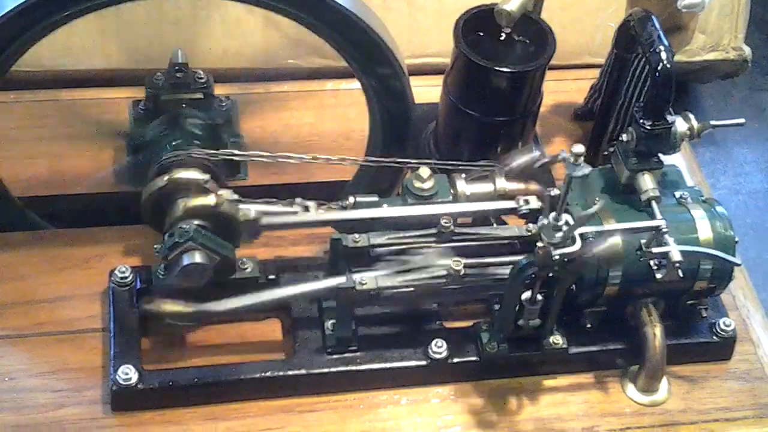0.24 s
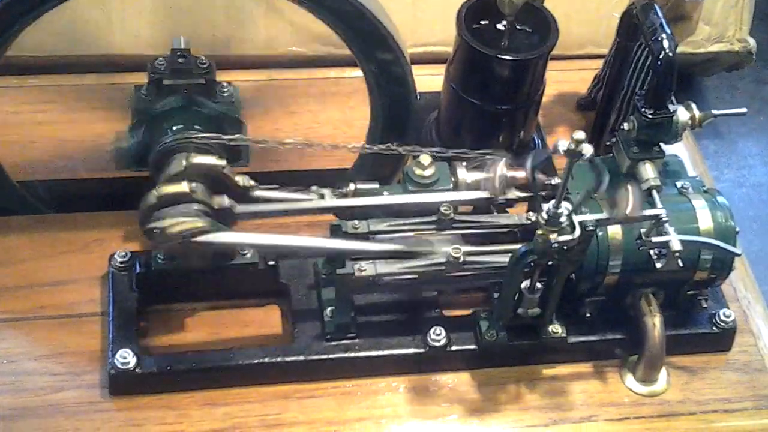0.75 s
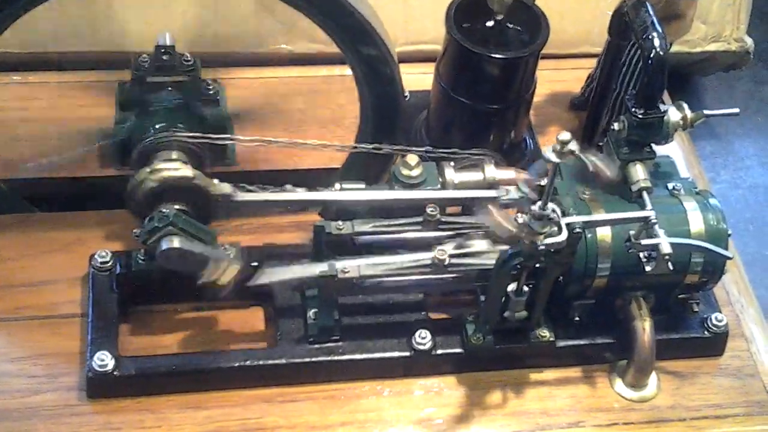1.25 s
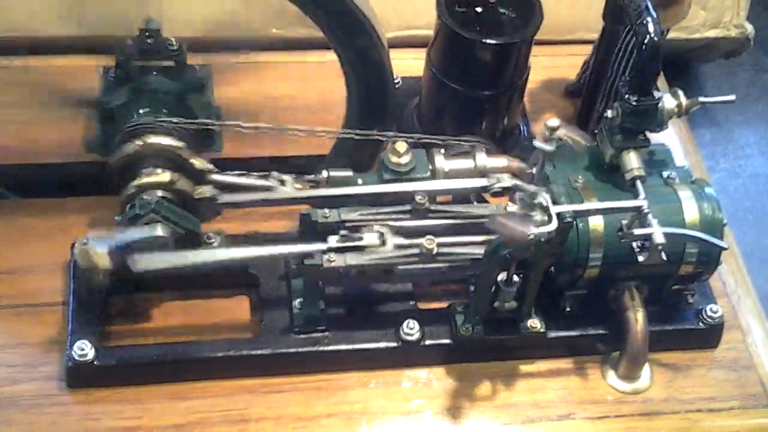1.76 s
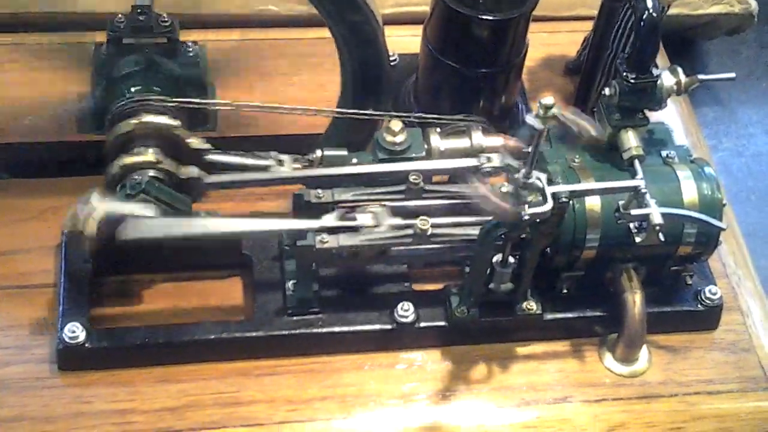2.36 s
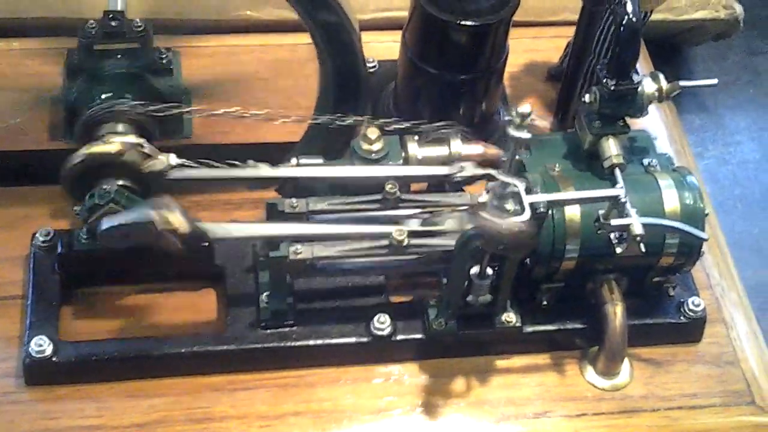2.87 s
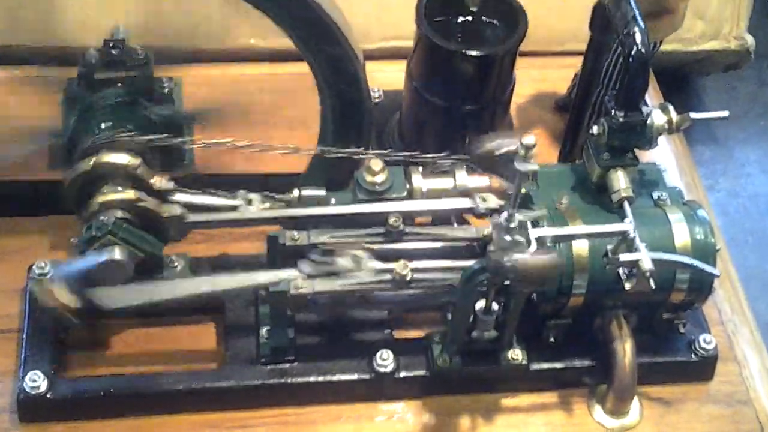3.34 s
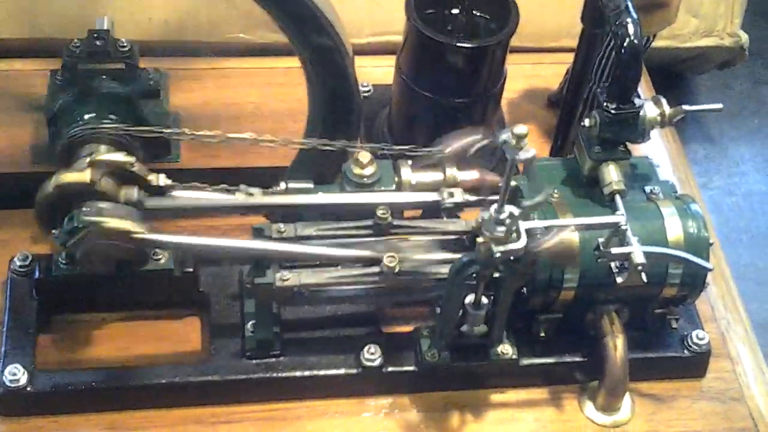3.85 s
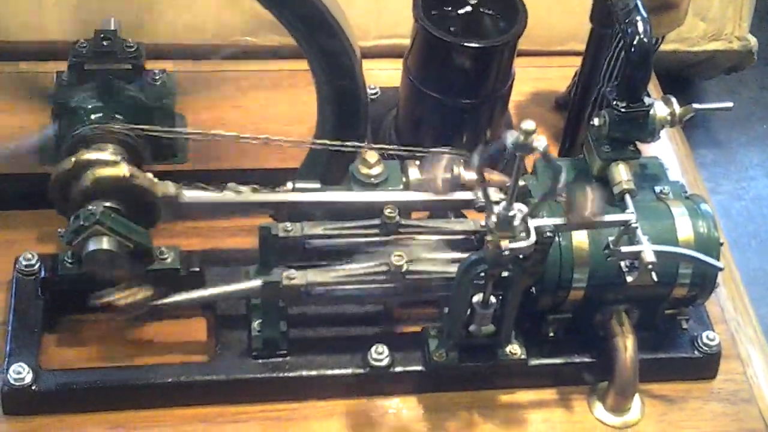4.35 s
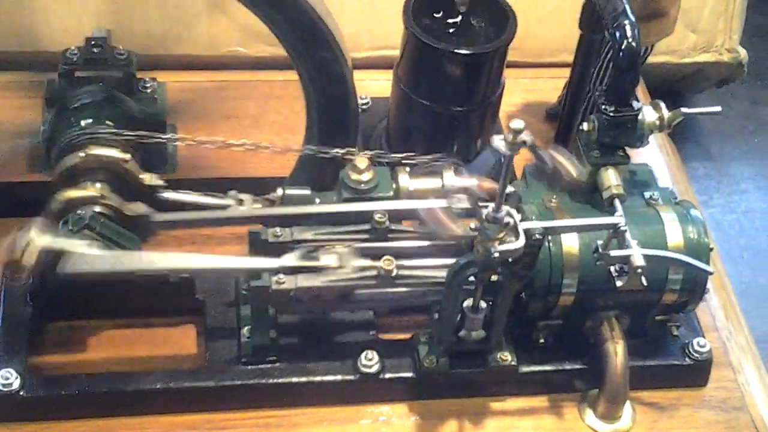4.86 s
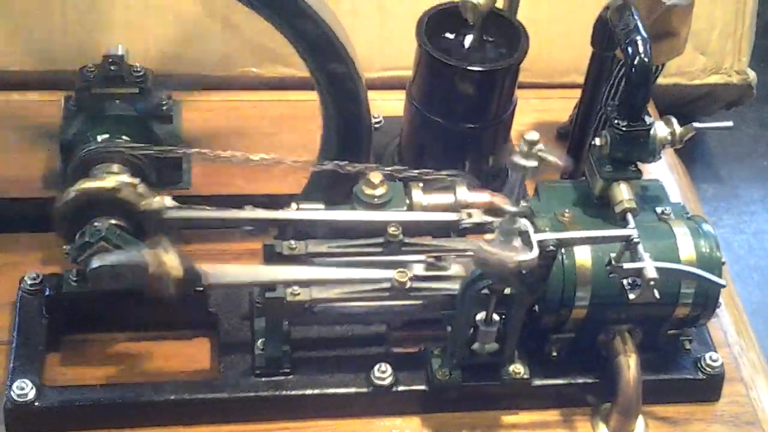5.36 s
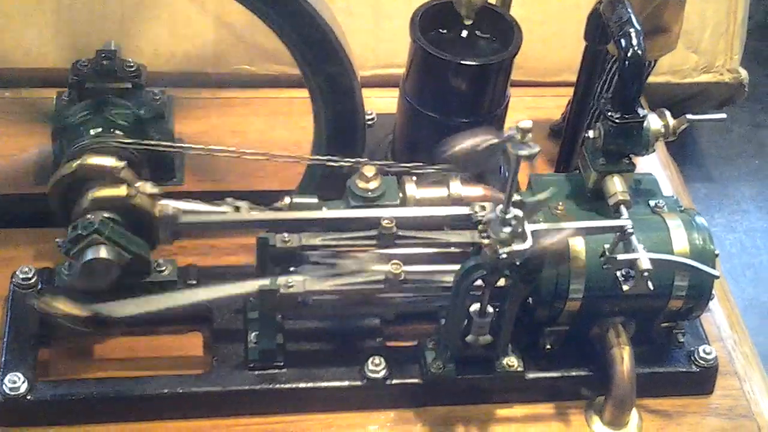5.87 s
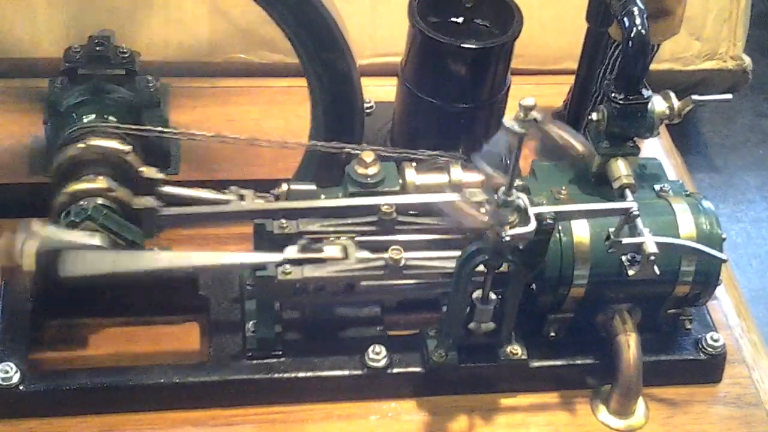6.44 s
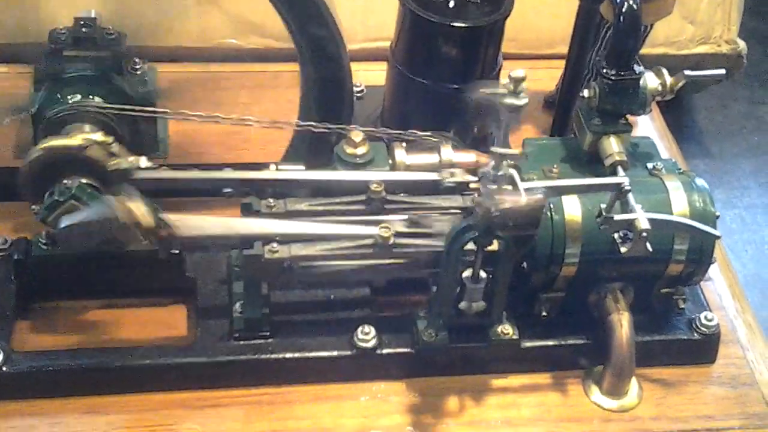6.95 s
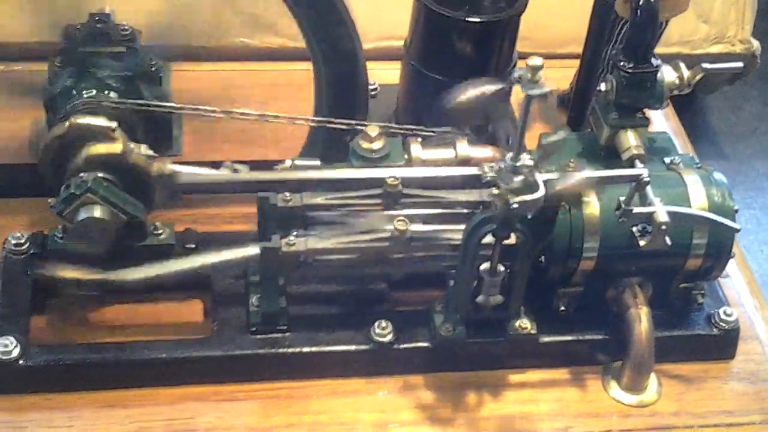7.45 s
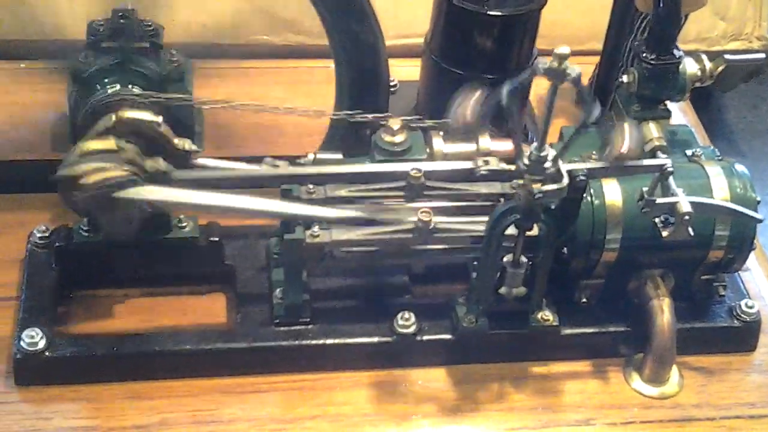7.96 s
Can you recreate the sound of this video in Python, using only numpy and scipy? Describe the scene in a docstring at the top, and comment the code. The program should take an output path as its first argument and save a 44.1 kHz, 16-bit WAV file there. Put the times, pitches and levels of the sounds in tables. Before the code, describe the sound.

Close, handheld recording of a small model mill engine running indoors. A dull double knock repeats about three times a second, ringing through its metal bed and wooden board. Between knocks, links tick brightly and irregularly, slides rumble and bump, and air whistles softly through valves. Brief rustles pass near the microphone. Past the middle, a compressor starts nearby and its low hum climbs quickly, then holds under the clatter to the end.

```python
"""Indoors, over steady hiss and a thin whine, a small model mill engine turns slowly on compressed air.
From the start, a slack bearing knocks twice into the bed on each turn, and the bed and its board ring.
Between knocks the links tick, the slides rumble and bump, and air whistles through the valve ports.
Short bright rustles of shaped noise pass near 2.4 s; at 5.15 s an air compressor starts nearby,
its hum made of sines that climb with the shaft speed; more rustles follow near 5.9 and 6.2 s."""
import sys
import numpy as np
from scipy import signal
from scipy.fft import rfft, irfft
from scipy.io import wavfile

SR = 44100
rng = np.random.default_rng(int(sys.argv[2]) if len(sys.argv) > 2 else 0)


def log_audio(samples):
    """Write samples as a 16-bit WAV file to the path given in sys.argv[1]."""
    # one column per channel
    frames = np.atleast_2d(samples).T
    # limit to full scale, then quantise
    limited = np.clip(frames, -1, 1)
    pcm = np.round(limited * 32767).astype(np.int16)
    wavfile.write(sys.argv[1], SR, pcm)


N = 362061


def from_db(db):
    """Turn decibels into a gain."""
    return 10 ** (np.asarray(db) / 20)


def rms_one(x):
    """Scale a signal to rms 1."""
    return x / np.sqrt(np.mean(x ** 2) + 1e-20)


def in_time(rows):
    """Draw straight lines between the timed rows, one curve for each column after the time."""
    s, *columns = np.transpose(rows)
    t = np.arange(N) / SR
    return [np.interp(t, s, column) for column in columns]


def drift(rate_hz):
    """A smooth random wander with rms 1; a higher rate wanders faster."""
    r = np.exp(-2 * np.pi * rate_hz / SR)
    noise = rng.standard_normal(N + SR)
    # the first second is dropped so that the filter has settled
    return rms_one(signal.lfilter([1], [1, -2 * r, r * r], noise)[SR:])


def band(x, edges_hz):
    """Keep only the sound between two frequencies."""
    return signal.sosfilt(signal.butter(2, edges_hz, "band", fs=SR, output="sos"), x + 1e-18)


def coloured(x, spectrum):
    """Shape a sound to a (frequency [Hz], level [dB]) curve, then scale it to rms 1."""
    hz, db = np.transpose(spectrum)
    f = np.maximum(np.fft.rfftfreq(N, 1 / SR), 1)
    gain = from_db(np.interp(np.log(f), np.log(hz), db))
    return rms_one(irfft(rfft(x) * gain, N))


def grains(per_s, spread_db):
    """Random tiny contacts of uneven size and either sign, rms 1."""
    sizes = from_db(spread_db * np.minimum(rng.exponential(1, N), 5))
    signed = sizes * rng.choice([-1, 1], N)
    return rms_one(signed * (rng.random(N) < per_s / SR))


def clicks(times, db):
    """Single-sample clicks of given levels at given times."""
    out = np.zeros(N)
    at = np.clip(np.round(times * SR).astype(int), 0, N - 1)
    np.add.at(out, at, from_db(db))
    return out


def ring(force, hz, t60):
    """A resonance: a unit click sets off a sine of height 1 that fades by 60 dB in t60 seconds."""
    r = from_db(-60 / (t60 * SR))
    w = 2 * np.pi * hz / SR
    return signal.lfilter([0, np.sin(w)], [1, -2 * r * np.cos(w), r * r], force + 1e-18)


def strike(modes, times, db, spread_db, pitch_hz=None):
    """Each blow sets every (Hz, t60, swing) mode ringing, with a little chance in its strength."""
    vary = spread_db * rng.standard_normal((len(times), len(modes)))
    if pitch_hz is not None:  # favour the modes near the pitch of the blow: 17 dB less per octave away
        mode_hz = np.array(modes)[:, 0]
        vary -= 17.0 * np.abs(np.log2(mode_hz / pitch_hz[:, None]))
    return sum(swing * ring(clicks(times, db + vary[:, k]), hz, t60)
               for k, (hz, t60, swing) in enumerate(modes))


# colour of the room and microphone hiss: (frequency [Hz], relative level [dB per Hz])
HISS_COLOUR = [(20, -30), (50, -17.5), (120, -7), (300, 8.5), (500, 13), (900, 4.5), (1600, 1), (3000, -1),
               (3800, -6), (5200, -16), (6000, -22), (8000, -12.5), (12000, -8.5), (14400, -12)]
# steady electric whine: (frequency [Hz], level [dB rms])
WHINE_TONES = [(11112, -79), (11650, -77), (12337, -76), (12397, -63), (12456, -77)]
HISS_DB = -43


def background():
    """Shaped noise makes a hiss of slightly uneven level; close steady sines make a thin whine."""
    t = np.arange(N) / SR
    whine = sum(np.sqrt(2) * from_db(db) * np.sin(2 * np.pi * hz * t) for hz, db in WHINE_TONES)
    level = from_db(HISS_DB + 1.6 * drift(16))
    return level * coloured(rng.standard_normal(N), HISS_COLOUR) + whine


# rustles close to the microphone: (start [s], swell [s], hold [s], level at the hold [dB])
RUSTLE_TIMES = [(2.367, 0.07, 0.028, -43), (2.402, 0.12, .045, -37.5), (5.891, 0.036, 0.017, -45.5),
                (6.205, 0.02, .001, -41.5)]
# colour of the rustles: (frequency [Hz], relative level [dB per Hz])
RUSTLE_COLOUR = [(880, -29), (1500, 2.5), (1950, -2.5), (2340, -9.5), (4890, -3), (6440, -15.5),
                 (7350, -11.5), (12600, -5), (14400, -9)]
RUSTLE_FADE_S, RUSTLE_RANGE_DB = 0.11, 49  # each one swells and fades over this range


def rustles():
    """Bright, slightly grainy bursts of noise that swell, hold and fade."""
    t = np.arange(N) / SR
    quiet = -RUSTLE_RANGE_DB
    gain = 0
    for start, swell, hold, db in RUSTLE_TIMES:
        corners = np.cumsum([start, swell, hold, RUSTLE_FADE_S])
        gain = gain + from_db(db + np.interp(t, corners, [quiet, 0, 0, quiet], -90, -90))
    noise = rng.standard_normal(N) + 0.48 * grains(710, 1.7)
    return gain * coloured(noise, RUSTLE_COLOUR)


# the compressor runs up to speed: (time [s], shaft speed [Hz], load [dB])
COMPRESSOR_RUN = [(5.15, 40, -50), (5.25, 46, -27), (5.32, 50.4, -18), (5.45, 56, -5), (5.85, 58.2, -2),
                  (6.4, 59, 0), (7.3, 59.7, 0), (8.21, 59.95, 1)]
# its hum at 0 dB load, before the path lifts: (multiple of shaft speed [-], level [dB rms])
HUM_ORDERS = [(1, -62), (2, -60.5), (3, -51), (4, -62), (5, -57), (6, -54), (7, -55), (8, -56), (10, -54.5),
              (12, -61), (14, -57)]
# resonances on the way to the microphone: (centre [Hz], width [Hz], lift [dB])
HUM_RESONANCES = [(145, 22, 16), (172, 2.5, -7), (347, 7, 11), (598, 8, 7)]
MOTOR_RUMBLE_DB, MOTOR_RUMBLE_HZ = -66, (35, 160)  # level at 0 dB load


def compressor():
    """Sines at multiples of the rising shaft speed, the higher ones wavering more, over a low rumble."""
    shaft_hz, load_db = in_time(COMPRESSOR_RUN)
    phase = 2 * np.pi * np.cumsum(shaft_hz) / SR
    on = np.arange(N) / SR > COMPRESSOR_RUN[0][0]
    hum = 0
    for k, db in HUM_ORDERS:
        # a tone grows or sinks as it climbs through a resonance
        path_db = sum(lift_db * np.exp(-((k * shaft_hz - centre_hz) / width_hz) ** 2)
                      for centre_hz, width_hz, lift_db in HUM_RESONANCES)
        waver_db = (0.7 + 0.09 * k) * drift(4.7)
        tone = np.sin(k * phase + rng.uniform(0, 2 * np.pi))
        hum = hum + from_db(db + load_db + path_db + waver_db) * tone
    noise = rms_one(band(rng.standard_normal(N), MOTOR_RUMBLE_HZ))
    rumble = from_db(MOTOR_RUMBLE_DB + load_db) * noise
    return on * (np.sqrt(2) * hum + rumble)


def turn_starts():
    """Each knock starts a turn; one more turn is added before and after."""
    s = np.array(KNOCK_BLOWS)[:, 0]
    return np.r_[2 * s[0] - s[1], s, 2 * s[-1] - s[-2]]


# changes round one turn, from the knock: (share of turn [-], sliding load [dB], valve flow [dB])
TURN_CYCLE = [(0, -5, -12), (.05, -8, -20), (.085, -8, -2), (.145, -5, 1), (.25, -3, -3), (.33, -3, -7),
              (.41, -6, -16), (.49, -5, -16), (.53, 1, 0), (.58, -1, 0), (.66, -4, -4), (.75, 1, -3),
              (.85, 0, -2), (.93, -2, -9), (1, -5, -12)]


def round_the_turn():
    """Sliding load and valve flow follow the crank angle, which the knocks mark."""
    s = turn_starts()
    angle = np.interp(np.arange(N) / SR, s, np.arange(len(s))) % 1
    share, load_db, flow_db = np.transpose(TURN_CYCLE)
    return np.interp(angle, share, load_db), np.interp(angle, share, flow_db)


def every_turn(contacts, spread_db, jitter_s):
    """Repeat (share of turn, dB, ..) rows as (s, dB, ..) on every turn, never quite alike."""
    s = turn_starts()
    rows = np.array([(start + share * length, *rest)
                     for start, length in zip(s, np.diff(s))
                     for share, *rest in contacts])
    rows[:, :2] += rng.standard_normal((len(rows), 2)) * [jitter_s, spread_db]
    inside = (rows[:, 0] > 0) & (rows[:, 0] < N / SR)
    return rows[inside]


# whistles of the valve ports: (frequency [Hz], width [Hz], relative level [dB])
PORT_WHISTLES = [(3620, 200, 19.5), (3728, 300, 22), (3050, 450, 12), (4600, 1350, 7.5)]


def valve(level_db):
    """Air through the ports whistles in narrow bands: fluttering noise through paired resonances."""
    air = rng.standard_normal(N) * from_db(1.6 * drift(76) + 0.73 * drift(7.0))
    whistle = 0
    for hz, width, db in PORT_WHISTLES:
        t60 = 4.5 / width  # a narrow band rings longer
        whistle = whistle + from_db(db) * rms_one(ring(ring(air, hz, t60), hz, t60))
    return from_db(level_db) * rms_one(whistle)


# how strongly loose parts and rubbing slides drive the bed: (frequency [Hz], drive [dB])
LOOSE_PART_DRIVE = [(175, -15.5), (240, -43.5), (300, 6), (370, -7), (470, 2), (580, -11), (700, -6),
                    (800, -36), (970, 2), (1150, -2), (1260, -4), (1400, -11), (2000, -11.5)]


def loose_bed():
    """The bed's ringing modes, with the strengths that loose parts give them."""
    hz, t60, first, second = np.transpose(BED_MODES)
    at_hz, db = np.transpose(LOOSE_PART_DRIVE)
    drive = from_db(np.interp(np.log(hz), np.log(at_hz), db))
    return np.c_[hz, t60, np.sign(first) * drive]


# base levels before the changes round the turn: (time [s], rumble [dB], valve hiss [dB])
SLIDE_AND_VALVE_LEVELS = [(0, -37.5, -48), (1, -38.5, -51), (2.2, -38.5, -52.5), (2.7, -37, -52),
                          (2.95, -41, -49.5), (4.85, -40, -48), (5.2, -36.5, -47), (5.8, -39.5, -50.5),
                          (8.21, -38, -50.5)]
# crosshead and rods bump dully as the load reverses: (share of turn [-], blow level [dB])
REPEATED_BUMPS = [(.517, -41), (.75, -47.5), (.96, -49)]
# further loose bumps, loud and faint: (time [s], blow level [dB])
LOOSE_BUMPS = [(.018, -46), (0.099, -36.5), (0.221, -39.5), (0.283, -41), (0.359, -45), (0.492, -39),
               (0.586, -44), (0.651, -43), (0.719, -44), (0.955, -39), (1.035, -44), (1.143, -42),
               (1.302, -52), (1.427, -39.5), (1.521, -35.5), (1.757, -51), (1.866, -35), (1.903, -39),
               (1.975, -44), (2.179, -38), (2.22, -36), (2.269, -56), (2.55, -40), (2.741, -38.5),
               (3.093, -43), (3.4, -41), (3.651, -41.5), (3.611, -44), (3.778, -45), (3.802, -39.5),
               (3.984, -51), (4.094, -51), (4.6, -41), (4.71, -42), (4.966, -44), (5.221, -40),
               (5.344, -53), (5.399, -56), (5.413, -47), (5.591, -46), (5.715, -39.5), (5.879, -41),
               (5.909, -34), (6.041, -37.5), (6.149, -56), (6.199, -42), (6.286, -43), (6.357, -45),
               (6.658, -44), (6.987, -42), (7.474, -37), (7.512, -39), (7.851, -55), (8.104, -54),
               (8.134, -34.5), (8.15, -39.5)]
BUMP_SPREAD_DB, BUMP_JITTER_S = 0.5, 0.003906


def slides(level_db):
    """Rubbing contacts keep the bed rumbling, its ringing shortened by the contact; parts also bump."""
    load = from_db(level_db + 1.36 * drift(29))
    bumps = np.r_[every_turn(REPEATED_BUMPS, BUMP_SPREAD_DB, BUMP_JITTER_S), LOOSE_BUMPS]
    rumble = sum(swing * ring(load * grains(300, 2.4), hz, 0.43 * t60)
                 for hz, t60, swing in loose_bed())
    load_rms = np.sqrt(np.mean(load ** 2))
    return load_rms * rms_one(rumble) + strike(loose_bed(), *bumps.T, spread_db=2.5)


# ringing of links and chain: (frequency [Hz], relative level [dB], 60 dB fade [s])
LINK_MODES = [(2015, -8.5, 0.01), (2450, -4.5, 0.0037), (2887, -7, 0.0085), (3450, -10, 0.007),
              (4080, -14, 0.011), (5150, -25.5, 0.026)]
# links that tick at the same place on every turn: (share of turn [-], blow level [dB], pitch [Hz])
REPEATED_TICKS = [(.004, -27, 2100), (.066, -26, 2100), (.21, -34, 4300), (.33, -46, 3800),
                  (.455, -33, 4200), (.575, -44, 4270), (.739, -28, 2420), (.91, -34, 4200)]
# further loose ticks, from faint to sharp: (time [s], blow level [dB], pitch [Hz])
LOOSE_TICKS = [(0.0181, -21, 3530), (0.0944, -24, 3550), (0.173, -21, 2870), (0.209, -25, 2940),
               (0.2475, -22.5, 3650), (0.272, -34, 3500), (0.288, -28, 2900), (0.3393, -31, 2920),
               (0.352, -25, 2900), (0.3675, -27, 3100), (0.412, -17, 3460), (0.4898, -24, 2000),
               (0.6509, -30, 2160), (0.5627, -26, 2730), (0.702, -22, 3080), (0.719, -27, 3100),
               (1.011, -22, 3040), (1.101, -28, 3140), (1.1394, -18, 2870), (1.179, -28, 2580),
               (1.2007, -19.5, 3600), (1.2548, -22, 2700), (1.274, -28, 2670), (1.4216, -18.5, 3080),
               (1.456, -25.5, 3040), (1.499, -23, 3560), (1.5196, -20, 3460), (1.5355, -29, 2300),
               (1.575, -19, 2310), (1.862, -22.5, 2290), (1.9038, -24, 2180), (2.3981, -24, 2930),
               (2.4379, -25, 3510), (2.459, -27, 3480), (2.4757, -27, 2600), (2.498, -22, 3880),
               (2.6762, -22, 2370), (2.7545, -27, 3020), (2.735, -14, 2920), (3.0661, -23.5, 3270),
               (3.1562, -26, 2550), (3.3306, -23, 2850), (3.47, -28, 3600), (3.6144, -22.5, 3080),
               (3.6506, -26, 2830), (3.6878, -27, 2670), (3.704, -19.5, 3160), (3.7675, -24.5, 2550),
               (3.7815, -22.5, 3620), (3.8494, -22.5, 2930), (3.93, -24, 2560), (3.9817, -11, 2700),
               (4.0043, -25, 2970), (4.0877, -18, 3140), (4.1482, -25, 2750), (4.5999, -21.5, 2720),
               (4.722, -27, 2020), (4.7845, -24, 2870), (4.865, -25, 2920), (4.903, -24.5, 2120),
               (4.9629, -23, 2170), (5.033, -33, 3600), (5.061, -19.5, 2400), (5.1447, -29, 3760),
               (5.1875, -18, 3030), (5.3462, -31, 1880), (5.3949, -11, 2450), (5.4555, -28, 2040),
               (5.659, -41, 2160), (5.771, -24, 2000), (5.7905, -26, 2020), (5.7125, -13.5, 2870),
               (5.8732, -26, 2120), (5.913, -20.5, 3360), (5.957, -22, 3550), (5.9737, -23, 2020),
               (5.9989, -18, 2920), (6.039, -22, 3040), (6.1184, -17.5, 3040), (6.1555, -20.5, 3790),
               (6.194, -17.5, 1960), (6.2335, -22.5, 3700), (6.313, -25, 2620), (6.3645, -21, 2220),
               (6.558, -27, 2220), (6.6024, -29, 2540), (6.6774, -25, 2760), (6.9157, -29, 2520),
               (6.969, -21, 2870), (7.1312, -19.5, 2480), (7.1523, -22.5, 3820), (7.23, -27, 2440),
               (7.253, -31, 2900), (7.375, -24, 2560), (7.411, -26, 3640), (7.449, -29, 2480),
               (7.469, -22.5, 2900), (7.511, -21.5, 2890), (7.531, -17.5, 2400), (7.543, -32, 2600),
               (8.168, -26, 2150), (8.1261, -20, 2420)]
# ways to the microphone, direct and off the board and wall: (delay [s], level [dB])
TICK_ROUTES = [(.0012, -2), (.0035, -3.5), (.008, -12), (.013, -19)]
TICK_SPREAD_DB, TICK_JITTER_S = 1.8, .0008
CRACK_DB, CRACK_HZ = -1.0, (1100, 3300)  # the bare contact, beside the ringing links
THUD_DB, THUD_LAG_S = -23.5, 0.00296  # the bed's answer
CHATTER_DB = -54.5


def ticks():
    """Links click brightly and the bed answers dully; many small random clicks fill in."""
    events = np.r_[every_turn(REPEATED_TICKS, TICK_SPREAD_DB, TICK_JITTER_S), LOOSE_TICKS]
    s, tick_db, pitch_hz = events.T
    arrivals = [(s + lag, tick_db + db, pitch_hz) for lag, db in TICK_ROUTES]
    times, db, hz = np.concatenate(arrivals, axis=1)
    # neighbouring modes swing opposite ways
    links = [(mode_hz, t60, (-1) ** k * from_db(mode_db))
             for k, (mode_hz, mode_db, t60) in enumerate(LINK_MODES)]
    clinks = strike(links, times, db, spread_db=4.5, pitch_hz=hz)
    cracks = band(clicks(times, db + CRACK_DB), CRACK_HZ)
    thuds = strike(loose_bed(), s + THUD_LAG_S, tick_db + THUD_DB, spread_db=3.0)
    chatter = sum(from_db(mode_db) * ring(grains(250, 3.5), mode_hz, t60)
                  for mode_hz, mode_db, t60 in LINK_MODES)
    return clinks + cracks + thuds + from_db(CHATTER_DB) * rms_one(chatter)


# the knock, once a turn: (time [s], first blow [dB], second blow [dB])
KNOCK_BLOWS = [(0.11, -21.5, -23), (0.4208, -22, -23), (0.7319, -21.5, -22.5), (1.0454, -21.5, -23),
               (1.356, -23.5, -24.5), (1.6702, -22.5, -24), (1.9869, -23.5, -24.5), (2.3004, -21, -23.5),
               (2.6138, -23.5, -23.5), (2.9265, -22.5, -25), (3.238, -23, -24.5), (3.5516, -23.5, -25),
               (3.8637, -24, -25.5), (4.1758, -21.5, -24), (4.489, -23, -23.5), (4.8026, -23, -23),
               (5.115, -23, -23.5), (5.427, -21.5, -23), (5.741, -22, -23), (6.0547, -24.5, -24),
               (6.3695, -23.5, -24.5), (6.6842, -24, -23), (6.9968, -23, -24.5), (7.31, -25, -23.5),
               (7.6249, -24, -24.5), (7.9369, -25.5, -23)]
# ringing of bed and board; a minus swing starts the other way:
# (frequency [Hz], 60 dB fade [s], swing from first blow [-], swing from second blow [-])
BED_MODES = [(175, .126, -.05, .28), (243, .18, .16, -.03), (274, .16, -.5, .2), (317, .092, .66, -.05),
             (357, .076, .3, .09), (412, .17, .23, .44), (468, .082, -.48, -1), (500, .14, .16, .41),
             (553, .14, .26, .14), (589, .072, .01, -.3), (682, .125, -.45, .19), (712, .16, .14, .33),
             (746, .138, .34, .05), (863, .18, .37, -.3), (896, .157, .2, -.02), (941, .18, -.49, -.48),
             (997, .125, .76, .58), (1087, .068, .17, -.23), (1139, .102, -.3, -.07),
             (1256, .048, .07, -.26), (1374, .039, .04, -.04), (1859, .046, .04, -.07),
             (1991, .034, -.07, -.15)]
SECOND_BLOW_S = .0197  # the slack is taken up in two blows this far apart
KNOCK_DETUNE, KNOCK_SPREAD_DB = .003, 2.0  # chance in pitch (as a share) and in strength
CONTACT_S = .0007  # softens the start of each blow


def knocks():
    """The slack bearing strikes the bed in two places on every turn, and the bed's modes ring."""
    hz, t60, *swings = np.transpose(BED_MODES)[:, :, None]
    t = np.arange(SR // 5) / SR
    out = np.zeros(N + SR)
    fade = from_db(-60 * t / t60) * (1 - np.exp(-t / CONTACT_S))
    chances = rng.standard_normal((len(KNOCK_BLOWS), 3, len(BED_MODES), 1))
    for (s, *dbs), chance in zip(KNOCK_BLOWS, chances):
        mode_hz = hz * (1 + KNOCK_DETUNE * chance[2])
        modes = fade * np.sin(2 * np.pi * mode_hz * t)
        for k, lag in enumerate((0, SECOND_BLOW_S)):
            i = round((s + lag) * SR)
            strength = swings[k] * from_db(dbs[k] + KNOCK_SPREAD_DB * chance[k])
            out[i:i + len(t)] += np.sum(strength * modes, axis=0)
    return out[:N]


# bands that rise and sink: (centre [Hz], width [Hz])
WANDERING_BANDS = [(300, 74), (420, 35), (720, 105), (1030, 255)]
# the lift of each band in turn: (time [s], band 1 [dB], band 2 [dB], band 3 [dB], band 4 [dB])
WANDERING_LIFTS = [(0, 1, -3.5, -4.5, -0.063), (1.3, 0, -6, -4, -0.083), (2.5, 0.24, -2.5, -1.5, -0.27),
                   (3.6, 0.3, -5.5, 0, 1.4), (4.5, 1, -1.5, -0.5, -1.7), (5.6, 0.26, 3, -1, -2.4),
                   (6.6, 0.94, -1.5, 0, -0.89), (8.21, 1, 0.5, 2, -3.4)]


def wandering_microphone(x):
    """The hand-held microphone wanders, so some bands of the engine rise or sink."""
    change = 0
    for (hz, width_hz), db in zip(WANDERING_BANDS, in_time(WANDERING_LIFTS)):
        peak = signal.iirpeak(hz, hz / width_hz, fs=SR)
        change = change + (from_db(db) - 1) * signal.lfilter(*peak, x)
    return x + change


ROOM_T60_S, ROOM_DB = .2, -18


def room(x):
    """Scattered echoes: a short fading tail of noise, duller than the direct sound."""
    t = np.arange(SR // 2) / SR
    tail = rng.standard_normal(len(t)) * from_db(-60 * t / ROOM_T60_S) * (t > .006)
    tail = signal.lfilter([.4], [1, -.6], tail)
    return signal.fftconvolve(x, tail / np.sqrt(np.sum(tail ** 2)))[:N]


BOARD_CUT_HZ = 206.6


def scene():
    """Engine in the room, compressor, rustles and background together."""
    load_db, flow_db = round_the_turn()
    rumble_db, hiss_db = in_time(SLIDE_AND_VALVE_LEVELS)
    engine = knocks() + ticks() + slides(rumble_db + load_db) + valve(hiss_db + flow_db)
    engine = wandering_microphone(engine)
    # the small board gives out little bass
    bass_cut = signal.butter(4, BOARD_CUT_HZ, "high", fs=SR, output="sos")
    engine = signal.sosfilt(bass_cut, engine)
    engine_in_room = engine + from_db(ROOM_DB) * room(engine)
    return (engine_in_room + compressor() + rustles() + background())[None]


CUTOFF_HZ = 14520


def record(dry):
    """A steep low-pass filter removes the highest treble."""
    return signal.sosfilt(signal.ellip(12, .5, 70, CUTOFF_HZ, fs=SR, output="sos"), dry)


dry = scene()
out = record(dry)
log_audio(out)
```